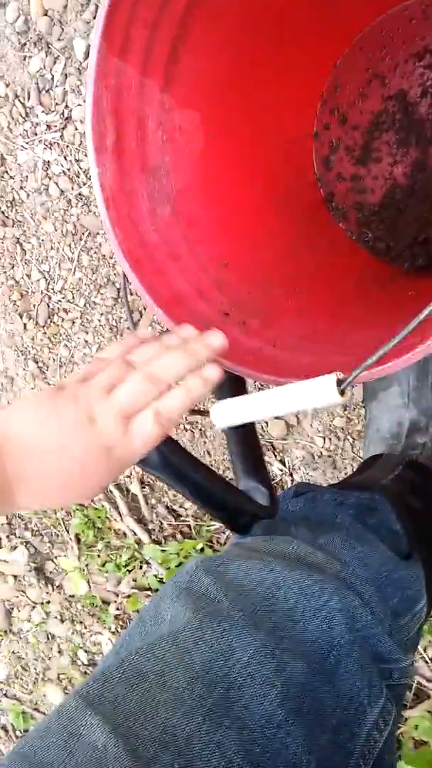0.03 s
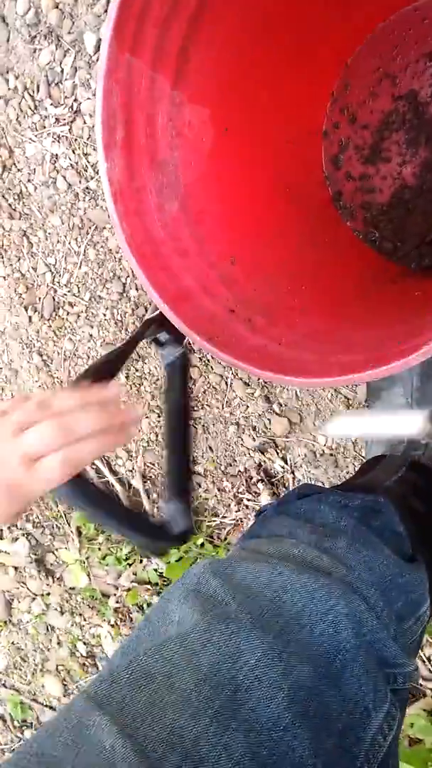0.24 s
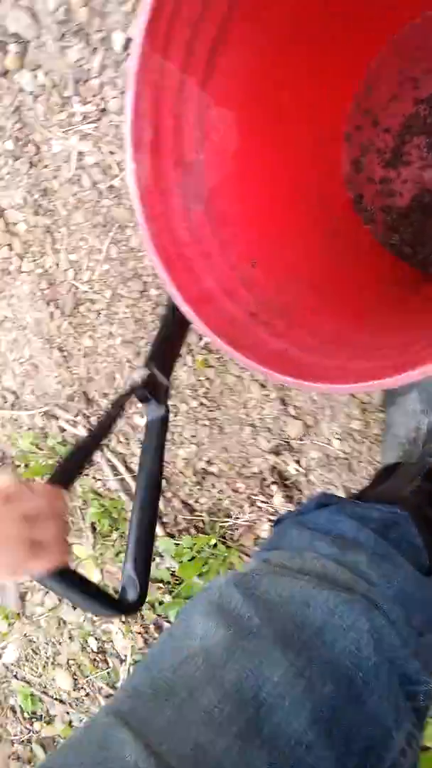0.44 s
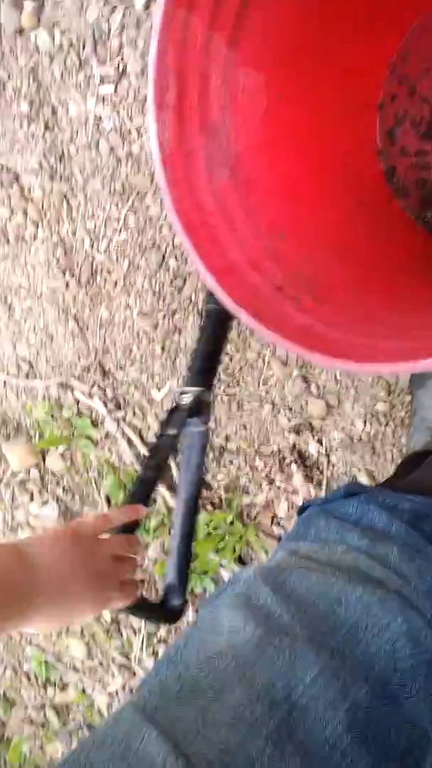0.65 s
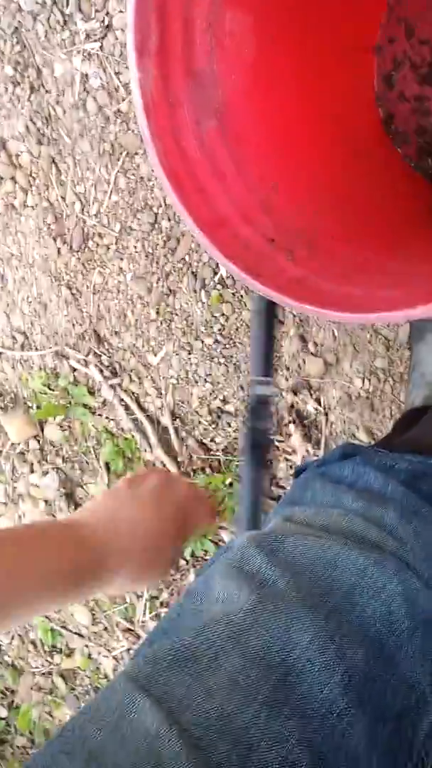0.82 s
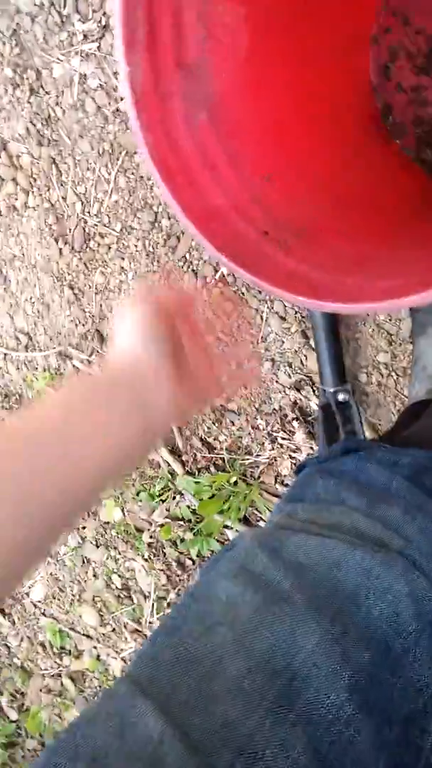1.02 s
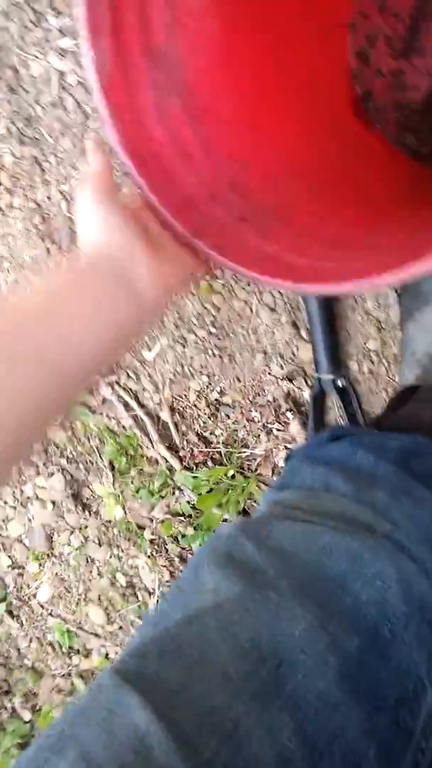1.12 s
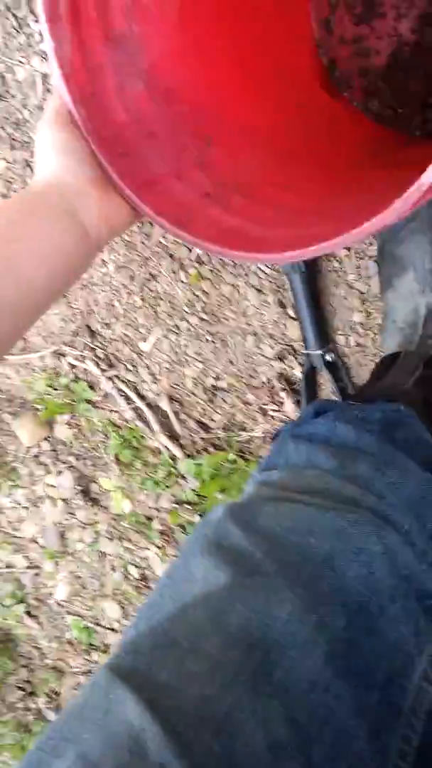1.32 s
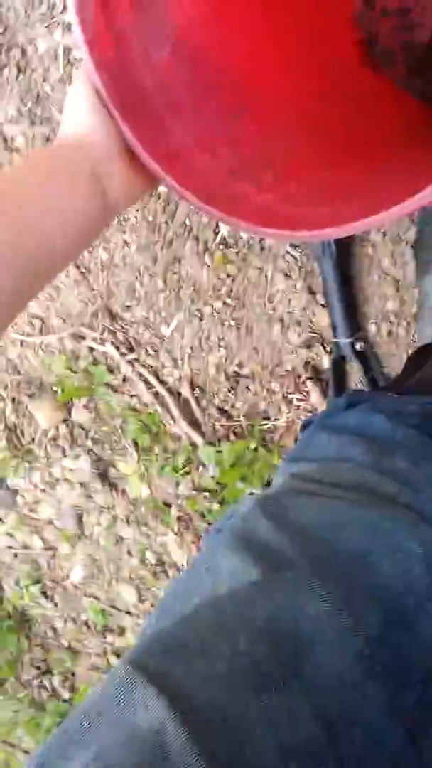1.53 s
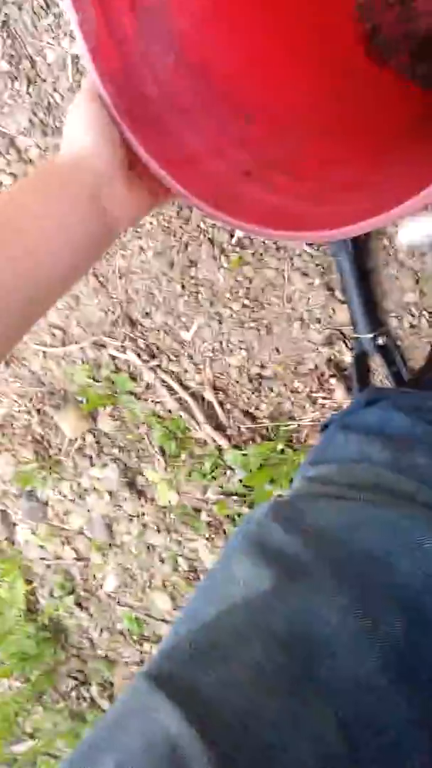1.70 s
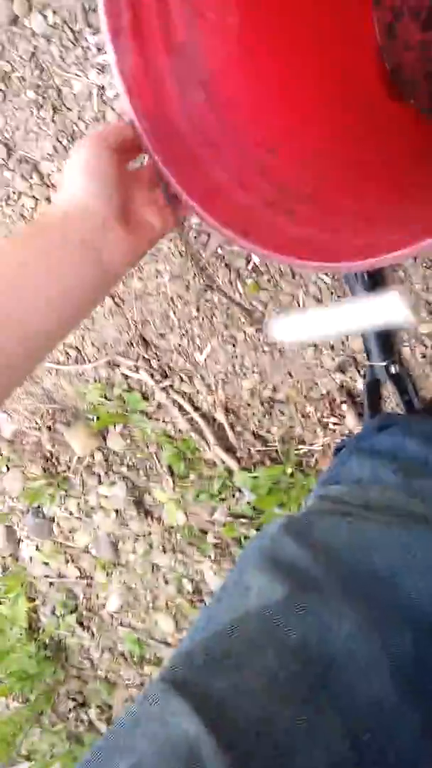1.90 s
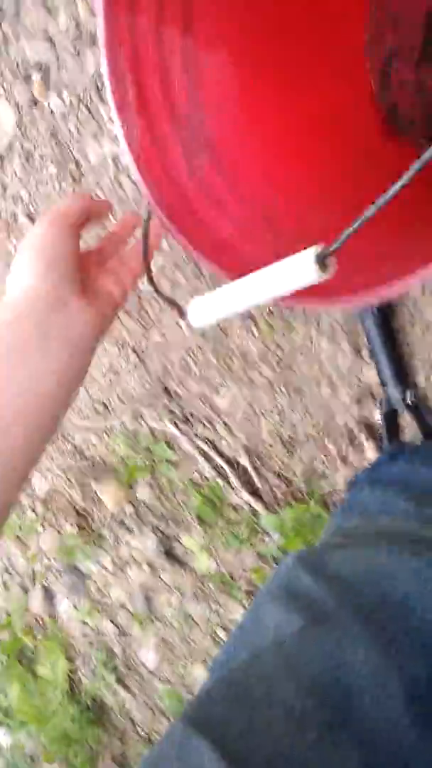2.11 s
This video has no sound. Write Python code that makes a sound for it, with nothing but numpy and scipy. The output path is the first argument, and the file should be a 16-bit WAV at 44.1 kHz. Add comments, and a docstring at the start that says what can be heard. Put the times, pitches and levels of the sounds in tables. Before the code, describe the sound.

An empty plastic bucket knocks hollowly as its handle drops, with clacks on gravel.

```python
"""An empty plastic bucket cracks and booms as its wire handle's plastic grip drops against it and bounces once.
A tool is laid down with a clack and crunches in the gravel; a hand takes the bucket by the rim and
the wire clicks in its lugs. Bucket, wire and tool ring in decaying modes over bursts of noise; the
gravel is noise in clumps. Close up and outdoors, over a soft hiss of air and trickling grit."""
import sys
import numpy as np
from scipy.fft import rfft, irfft, next_fast_len
from scipy.io import wavfile
from scipy.ndimage import map_coordinates

SR = 44100
rng = np.random.default_rng(int(sys.argv[2]) if len(sys.argv) > 2 else 0)


def generate_wav(signal):
    """Clip the signal to [-1, 1] and save it as 16-bit WAV at the path in sys.argv[1]."""
    frames = np.transpose(np.atleast_2d(signal))
    scaled = np.clip(frames, -1, 1) * 32767
    pcm = np.round(scaled).astype(np.int16)
    wavfile.write(sys.argv[1], SR, pcm)


N = 94815
TIME = np.arange(N) / SR
SPLIT = np.array([[.5], [-.5]])  # shares a difference between left and right
SCATTER_RAD = 0.56  # spread of a high mode's phase between the channels
# dull thud of a contact, for bucket and tool: f/Hz, density/dB
THUD = [(25, -62), (70, -17), (140, -16.5), (195, 2.5), (260, -15), (380, 5), (600, -8.5), (1500, -34)]
THUD_T60_S = 0.058


def amp(db):
    """Decibels to gain."""
    return 10 ** (np.asarray(db) / 20)


def unit(x):
    """Scale to rms 1."""
    return x / np.sqrt(np.mean(x ** 2) + 1e-20)


def along(points, hz):
    """Read a curve of (f/Hz, value) points on a log frequency axis."""
    f, v = np.transpose(points)
    return np.interp(np.log(hz + 1), np.log(f + 1), v)


def wobble(rate):
    """A smooth random curve, rate knots a second."""
    return map_coordinates(rng.standard_normal(int(N * rate / SR) + 4), [TIME * rate])


def filtered(x, response):
    """Shape x with a complex frequency response."""
    size = next_fast_len(N + 8192)
    return irfft(rfft(x, size) * response(np.fft.rfftfreq(size, 1 / SR)), size)[..., :N]


def soften(x, cut_hz):
    """A causal two-pole low-pass."""
    return filtered(x, lambda hz: 1 / (1 + 1j * np.sqrt(2) * hz / cut_hz - (hz / cut_hz) ** 2))


def noise(spectrum, likeness=None):
    """Coloured stereo noise of rms 1, as wide as a close source unless a likeness curve is given."""
    # stereo width of close sources: f/Hz, left-right likeness
    close_likeness = [(300, 1), (600, 0.68), (1100, 0.25), (1800, 0.62), (3000, 0.12), (6000, 0.098)]

    def response(hz):
        width = np.arccos(np.clip(along(likeness or close_likeness, hz), -1, 1)) / 2
        return amp(along(spectrum, hz)) * np.array([np.cos(width), np.sin(width)])
    mid, side = filtered(rng.standard_normal((2, N)), response)
    return unit(np.array([mid + side, mid - side]))


def pan(balance, hz):
    """Left and right gains of constant total power."""
    gains = amp(along(balance, hz) * SPLIT)
    return gains / np.sqrt(np.mean(gains ** 2, axis=0))


def envelope(t, attack, hold, t60):
    """Rise, hold and exponential release from t = 0, all in seconds."""
    t = np.maximum(t, 0)
    return (1 - np.exp(-t / attack)) * np.exp(-np.log(1000) * np.maximum(t - hold, 0) / t60)


def ring(modes, start, attack, hold, length=1, scatter=0):
    """Decaying modes struck at start; length scales their t60, scatter puts the channels out of step."""
    out, first = np.zeros((2, N + SR)), int(start * SR)
    t = TIME[:SR // 2]
    for hz, db, t60 in modes:
        phase = rng.uniform(0, 2 * np.pi) + scatter * rng.standard_normal() * SPLIT
        tone = amp(db) * np.sin(2 * np.pi * hz * t + phase)
        out[:, first:first + len(t)] += tone * envelope(t, attack, hold, t60 * length)
    return out[:, :N] / np.sqrt(sum(amp(db) ** 2 for _, db, _ in modes) / 2)


def air():
    """A steady bed of outdoor hiss, wide above the bass."""
    # colour of the air: f/Hz, density/dB
    colour = [(30, -45), (70, -23), (130, -18), (200, -19), (290, -8.5), (400, 0.5), (480, 1.5), (700, -3),
              (1200, -3), (1600, -7), (2400, -3.5), (3500, -12.5), (5000, -13.5), (6500, -18), (8000, -29),
              (12000, -28), (16000, -43)]
    # its width: f/Hz, left-right likeness
    likeness = [(60, 1), (130, 0.66), (290, 1), (640, -0.7), (1400, -0.26), (6800, 0.073)]
    # its lean: f/Hz, left minus right/dB
    balance = [(200, 2.5), (380, -9.5), (700, 0.5), (1300, 3), (2400, -2), (8000, 3)]
    hiss = filtered(noise(colour, likeness), lambda hz: pan(balance, hz))
    return amp(-42.5 + .6 * wobble(24.83)) * hiss


def rustle():
    """Grit and cloth stir unevenly while things are moved."""
    # swell of the rustle: t/s, level/dB
    swell = [(0, -57.5), (.2, -54.5), (.35, -43.5), (.52, -50), (.66, -43.5), (.76, -40.5), (.87, -40),
             (.96, -40), (1.08, -41), (1.2, -51), (1.45, -52), (1.65, -62), (2.15, -62.5)]
    # its colour: f/Hz, density/dB
    colour = [(50, -40), (200, -6), (500, 0.5), (1500, 0), (3000, -0.5), (7000, -9.5), (10000, -5),
              (13000, -20), (16000, -23)]
    texture = unit(noise(colour) * amp(2.6 * wobble(60.54) + 1.8 * wobble(700)))
    return amp(np.interp(TIME, *np.transpose(swell))) * texture


def rumble():
    """The bucket gives a low, hollow murmur as it is shifted."""
    # swell of the murmur: t/s, level/dB
    swell = [(0, -81), (.4, -64), (.52, -65), (.66, -72), (.95, -79), (1.11, -44), (1.22, -76),
             (1.5, -58.5), (1.62, -58.5), (1.75, -67.5), (1.9, -73.5), (2.14, -52)]
    # its colour: f/Hz, density/dB
    colour = [(25, -32), (70, -26), (130, -23), (190, -1.5), (230, -3), (300, -24), (450, -7), (800, -33),
              (3000, -70)]
    level_db = np.interp(TIME, *np.transpose(swell)) + 2.9 * wobble(34.4)
    return amp(level_db) * noise(colour)


def bucket():
    """Each knock cracks, chatters in the wall and booms; soft ones are duller, a touch cuts the ring."""
    # hits: t/s, wall/dB, boom/dB, thud/dB, crack/dB, chatter/s, share of the free ring, wall cut-off/Hz
    knocks = [(0.161, -27, -57, -64, -44.5, .003, 0.96, 1900),
              (.209, -5.5, -13, -21, -14, 0.018, 0.91, 8000), (.322, -35, -60, -57, -66, .004, 0.47, 2480),
              (.411, -17.5, -23.5, -48, -27, .02, 0.53, 2550),
              (.430, -19, -31, -57, -37, 0.0092, 0.96, 2450),
              (0.52, -60, -37.5, -42.5, -64, 0.0052, 0.29, 1500),
              (.985, -23, -38, -31.5, -38, 0.0019, 0.48, 5850),
              (1.000, -31, -34.5, -34, -61, 0.0089, 0.48, 1800),
              (1.057, -40.5, -46, -51, -61, 0.026, .7, 5000),
              (1.476, -25.5, -39, -38.5, -52, 0.0032, 0.49, 1440),
              (1.489, -36, -47, -62, -58, 0.0031, 0.55, 3000),
              (1.533, -40.5, -44.5, -50, -60, .008, 0.14, 1300),
              (1.795, -29, -48.5, -42.5, -63, 0.0034, 0.27, 1040),
              (1.815, -38.5, -51.5, -52, -50, 0.009, 0.37, 1500)]
    # deep modes of the body: f/Hz, level/dB, free t60/s
    boom_modes = [(227.3, 0, .46), (288, -7.5, .4), (384.2, -12, 0.34), (490.8, -18, 0.27),
                  (551, -25, 0.22), (767, -8, .21)]
    # stiffer modes of the wall: f/Hz, level/dB, free t60/s
    wall_modes = [(958, -3, .07), (982, 2, .07), (1127, -7, .14), (1246, -5, .15), (1303, -4, .11),
                  (1491, -1, .08), (1637, -4, .12), (1701, -3, .15), (1766, -3, .12), (1915, -5, .11),
                  (2165, -16, .11), (2602, -19, .12), (2740, -8, .07), (2934, -14, .1)]
    # crowded short modes of the plastic, played as noise: f/Hz, density/dB
    plastic_colour = [(100, -45), (250, -18), (450, -9.5), (620, -11.5), (800, -10), (1000, -2.5),
                      (1750, -3.5), (2250, -10.5), (2900, -7), (3700, -25), (7000, -45), (14000, -52)]
    # bright crack of contact: f/Hz, density/dB
    crack_colour = [(400, -36), (1500, 9), (3000, 2), (5000, 4.5), (7500, -4.5), (9700, 5), (12000, -11),
                    (16000, -27)]
    wall_attack_s, handle_rests_s, damping_db_per_s = 0.00047, 0.4335, 126
    plastic, dull, bright = noise(plastic_colour), noise(THUD), noise(crack_colour)
    # lying against the wall after its bounce, the handle chokes the earlier booms
    choke = amp(-damping_db_per_s * np.maximum(TIME - handle_rests_s, 0))
    out = np.zeros((2, N))
    for start, wall_db, boom_db, thud_db, crack_db, chatter, length, cut_hz in knocks:
        t = TIME - start
        wall = amp(1.5) * ring(wall_modes, start, wall_attack_s, chatter / 2, length, SCATTER_RAD)
        wall += amp(-5) * plastic * envelope(t, wall_attack_s, chatter, t60=0.12 * length)
        boom = ring(boom_modes, start, attack=0.0041, hold=chatter, length=length)
        if start < handle_rests_s:
            boom *= choke
        thud = dull * envelope(t, wall_attack_s, chatter, THUD_T60_S)
        crack = bright * envelope(t, attack=0.0001, hold=0.1 * chatter, t60=0.13 * length)
        out += amp(wall_db) * soften(wall, cut_hz) + amp(boom_db) * boom
        out += amp(thud_db) * thud + amp(crack_db) * crack
    return out


def wire():
    """The wire slips in a lug: a snap and a very short, high ring."""
    # slips: t/s, level/dB
    clicks = [(0.627, -44.5), (0.763, -45), (1.040, -22), (1.139, -41), (1.18, -45), (1.240, -46.5),
              (1.336, -51)]
    # modes of the wire: f/Hz, level/dB, t60/s
    modes = [(2200, -12, 0.15), (3310, -11, 0.08), (4910, -10, 0.042), (8640, -6, 0.019),
             (10170, 5.5, 0.0089), (12270, -20, .025)]
    # colour of the snap: f/Hz, density/dB
    snap_colour = [(300, -4), (1200, 0.5), (3000, 0), (7000, -4), (9700, 8.5), (12000, -3.5), (15500, -17)]
    hold_s = 0.0012
    bright = amp(3) * noise(snap_colour)
    out = np.zeros((2, N))
    for start, db in clicks:
        ping = amp(5) * ring(modes, start, attack=0.00038, hold=hold_s, scatter=SCATTER_RAD)
        snap = bright * envelope(TIME - start, attack=0.0004, hold=hold_s, t60=0.026)
        out += amp(db) * (ping + snap)
    return out


def gravel():
    """Stones grind in short clumps of grains, with bright grit on top."""
    # crunches and scrapes: t/s, stones/dB, grit/dB, hold/s, t60/s
    crunches = [(0.638, -46, -37.5, 0.0058, 0.051), (0.7776, -24.5, -19.5, 0.0019, 0.056),
                (0.787, -24, -24.5, 0.0052, 0.022), (0.794, -31, -36.5, 0.03, 0.14),
                (.8235, -38, -19.5, 0.0024, 0.02), (0.832, -33, -50, .003, 0.064),
                (0.9, -34.5, -35, 0.0046, 0.032), (0.908, -35.5, -54, 0.016, 0.056),
                (0.975, -27, -30, 0.0026, 0.042)]
    # body of the stones: f/Hz, density/dB
    stone_colour = [(40, -40), (150, -23), (500, -14.5), (1100, 3), (1500, -2), (2000, 1), (2600, -1),
                    (4500, -9.5), (8000, -39), (15000, -52)]
    # sizzle of the grit: f/Hz, density/dB
    grit_colour = [(100, -50), (1500, -17), (3500, -11.5), (6300, -2.5), (7800, -7), (9700, 2.5),
                   (12000, -6), (15500, -18)]
    clumps = unit(amp(1.3 * wobble(900)))
    stones, grit = noise(stone_colour) * clumps, noise(grit_colour) * clumps
    out = np.zeros((2, N))
    for start, stones_db, grit_db, hold, t60 in crunches:
        grind = amp(stones_db) * stones + amp(grit_db) * grit
        out += grind * envelope(TIME - start, attack=0.0013, hold=hold, t60=t60)
    return out


def tool():
    """The tool's grip lands on the stones and bounces: a dry clack and a slight thud."""
    # landings: t/s, clack/dB, thud/dB
    landings = [(.780, -24, -37.5), (0.787, -20, -39), (0.825, -23.5, -37.5), (0.908, -37.5, -55)]
    # short modes of the tool: f/Hz, level/dB, t60/s
    modes = [(1073, 2.5, 0.09), (1303, -1.5, 0.13), (1465, 3.5, 0.025), (1563, -7, 0.14), (1786, -7, 0.053),
             (1940, 4, 0.03), (2080, -1, 0.055), (2830, -7, 0.039)]
    dull = noise(THUD)
    out = np.zeros((2, N))
    for start, clack_db, thud_db in landings:
        clack = ring(modes, start, attack=0.00072, hold=0.0052, scatter=SCATTER_RAD)
        thud = dull * envelope(TIME - start, attack=0.00083, hold=0.011, t60=THUD_T60_S)
        out += amp(clack_db) * clack + amp(thud_db) * thud
    return out


def squeak():
    """One faint squeak, a blip of narrow-band noise."""
    # band of the squeak: f/Hz, density/dB
    colour = [(1500, -60), (2350, -14), (2620, 0), (2950, -18), (4500, -60)]
    peak_s, width_s = 1.403, 0.0075
    return amp(-43) * noise(colour) * np.exp(-((TIME - peak_s) / width_s) ** 2)


def scene():
    """Close sounds reach left and right out of step, treble mostly right; squeak and air lie on top."""
    # lean of the close sounds: f/Hz, left minus right/dB
    balance = [(250, 0), (500, -4.5), (1000, 1), (1800, -3.5), (3000, -0.5), (6000, -3), (8000, -9.5),
               (10000, -16), (14000, -5)]
    # their phase offset: f/Hz, lead of the left/rad
    lead = [(200, 0), (400, -1.7), (720, 0.5), (1050, 1.08), (1700, 1.24), (2700, 2.5), (5000, 4)]
    close = bucket() + rumble() + tool() + gravel() + wire() + rustle()
    placed = filtered(close, lambda hz: pan(balance, hz) * np.exp(1j * along(lead, hz) * SPLIT))
    return placed + squeak() + air()


def record(dry):
    """A soft clip rounds off the loudest peaks, then the very top is cut away."""
    top_hz = 16200
    clipped = dry / (1 + np.abs(dry) ** 8) ** (1 / 8)
    return filtered(clipped, lambda hz: hz < top_hz)


dry = scene()
out = record(dry)
generate_wav(out)
```